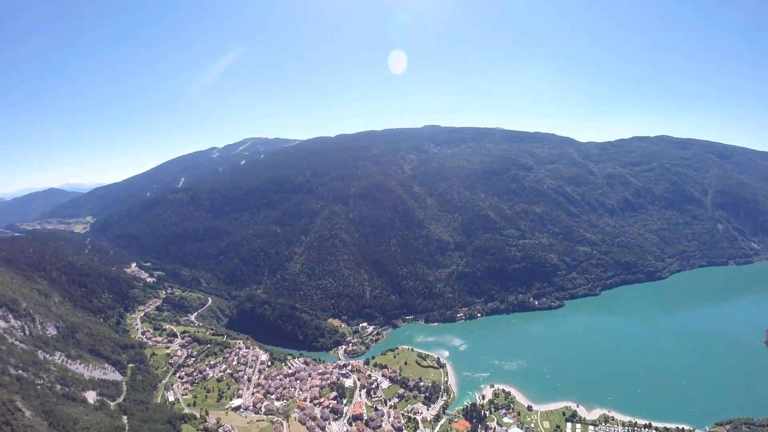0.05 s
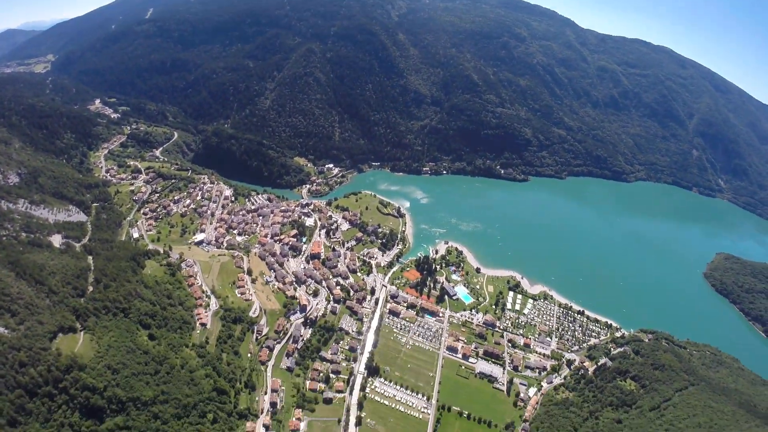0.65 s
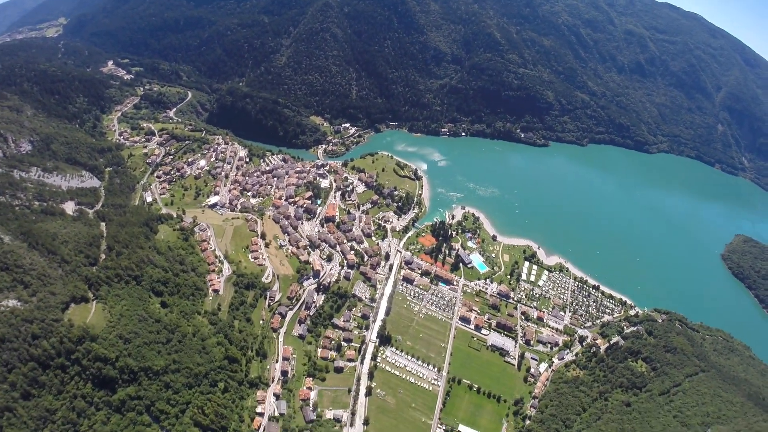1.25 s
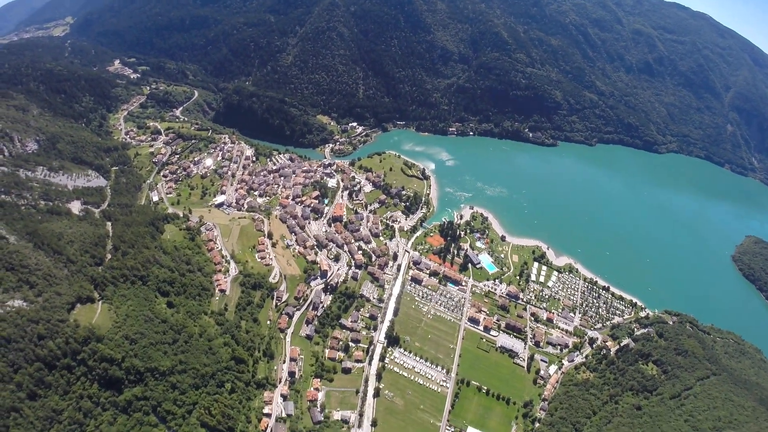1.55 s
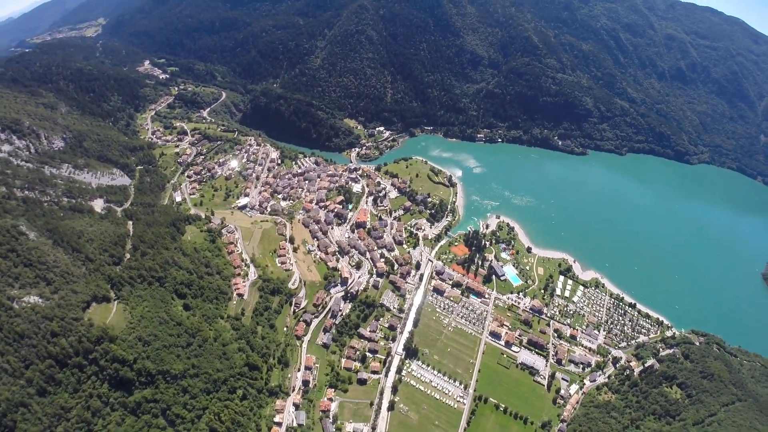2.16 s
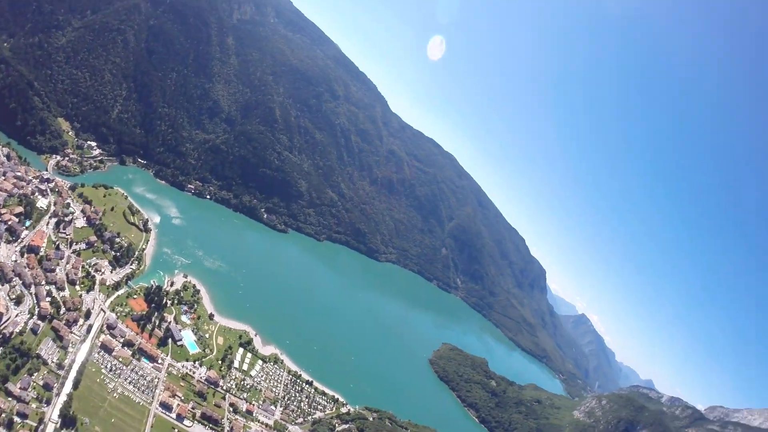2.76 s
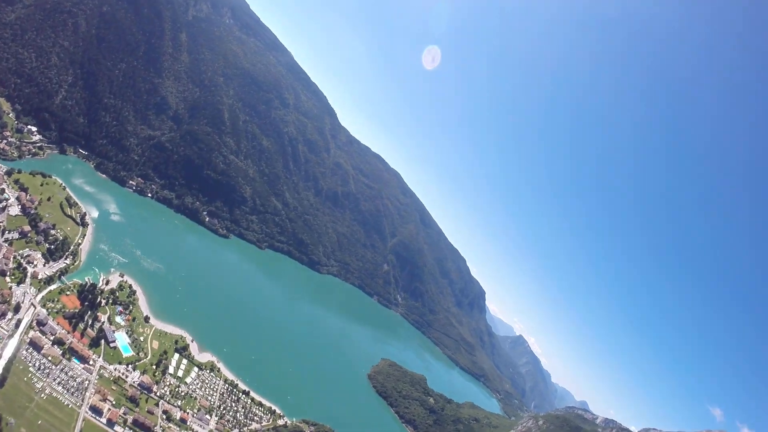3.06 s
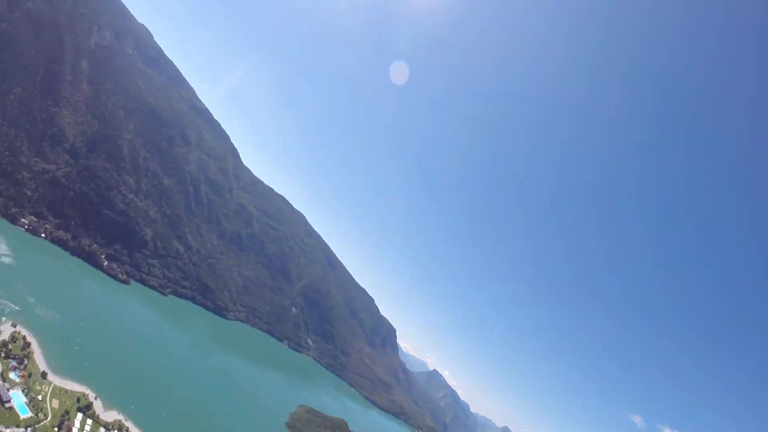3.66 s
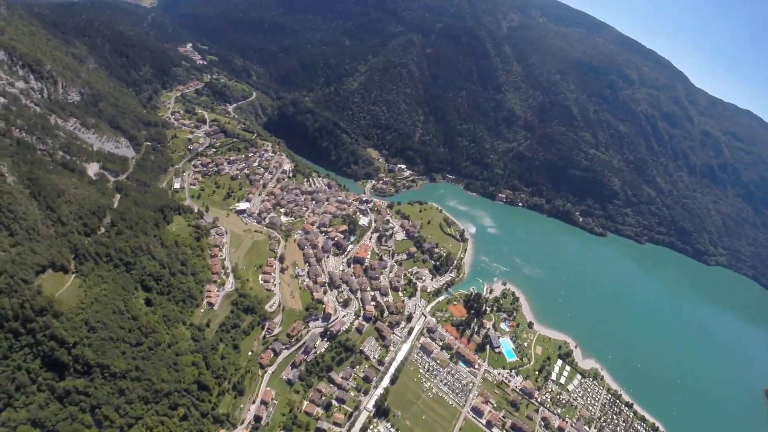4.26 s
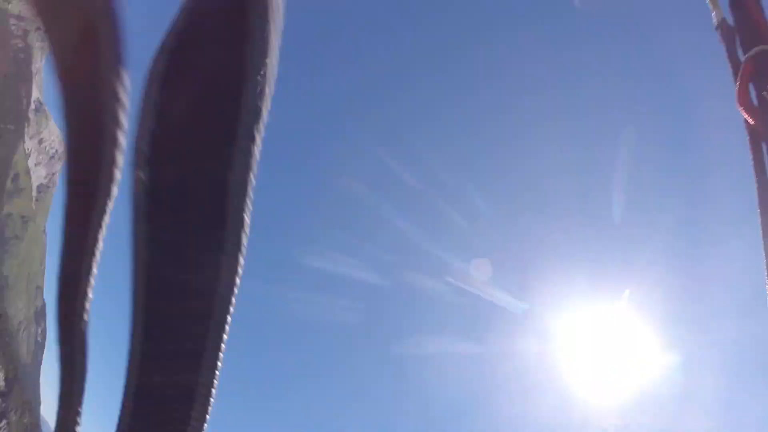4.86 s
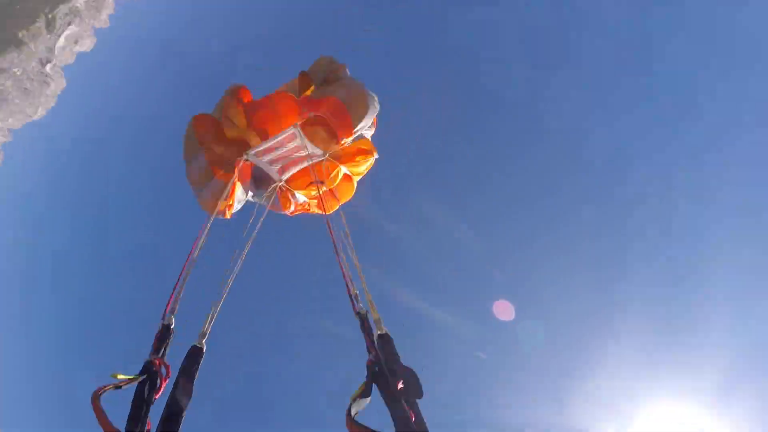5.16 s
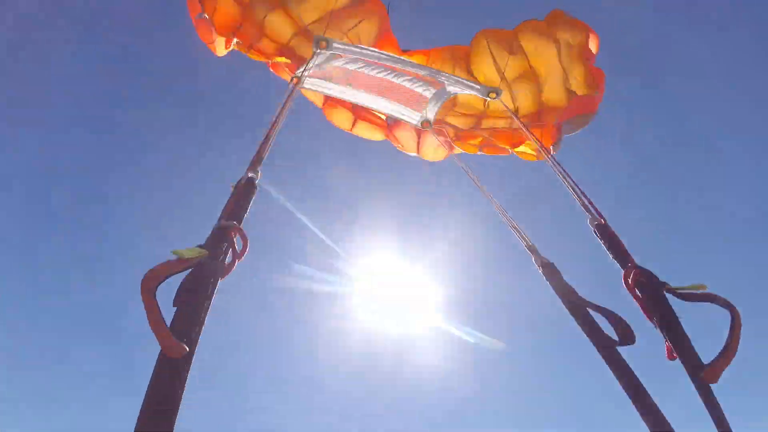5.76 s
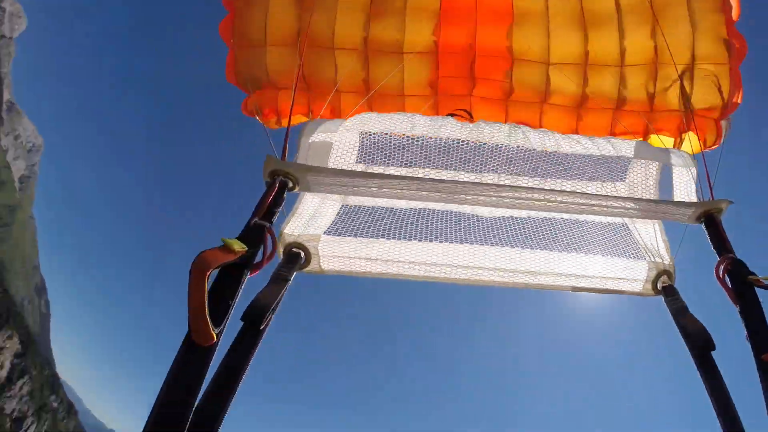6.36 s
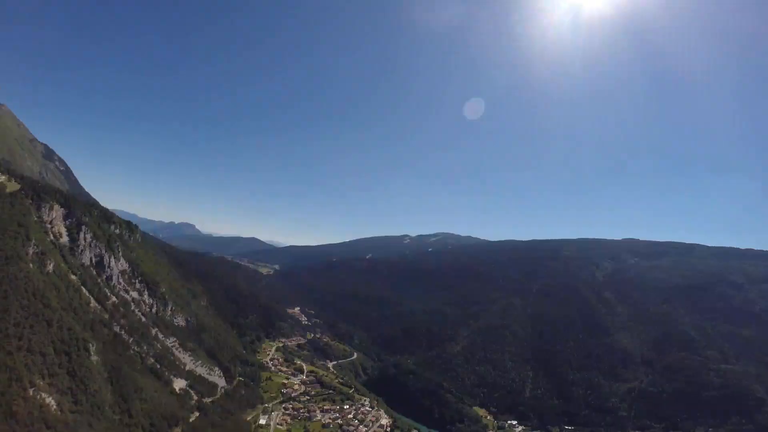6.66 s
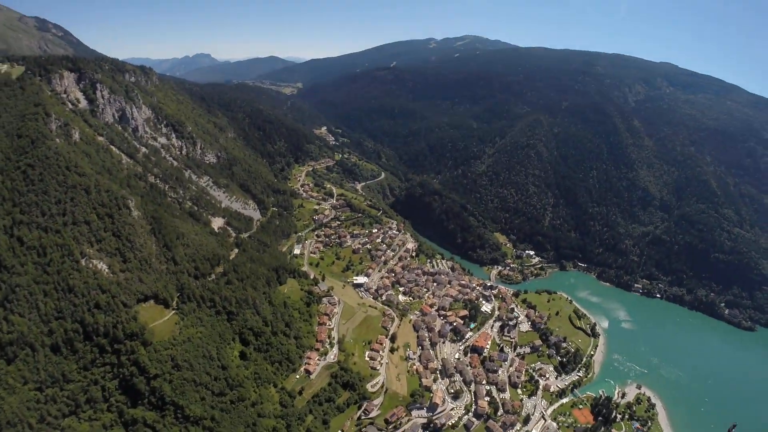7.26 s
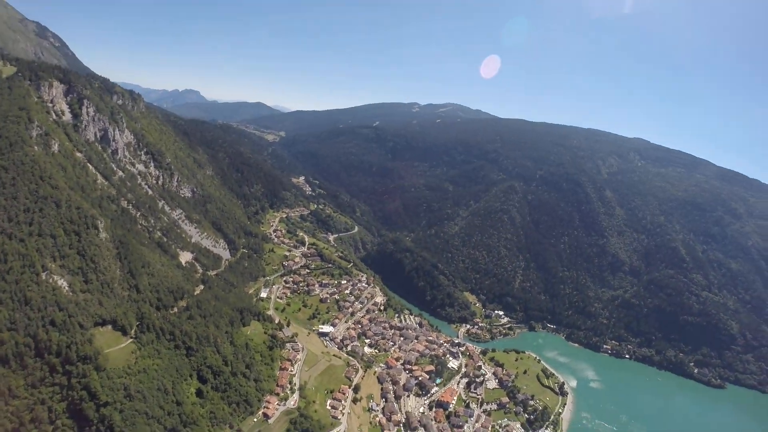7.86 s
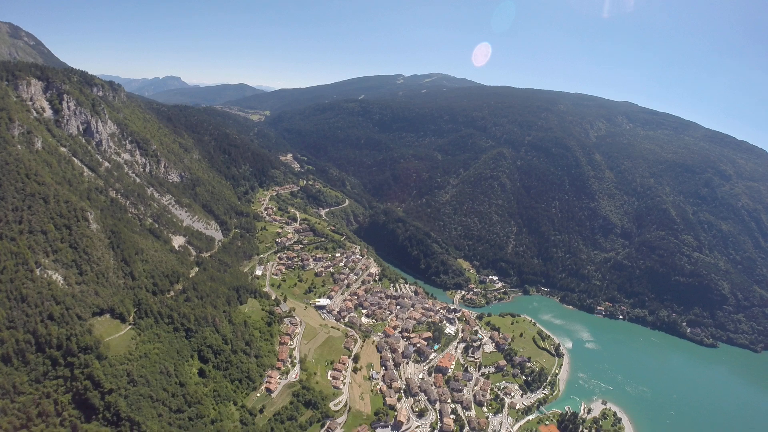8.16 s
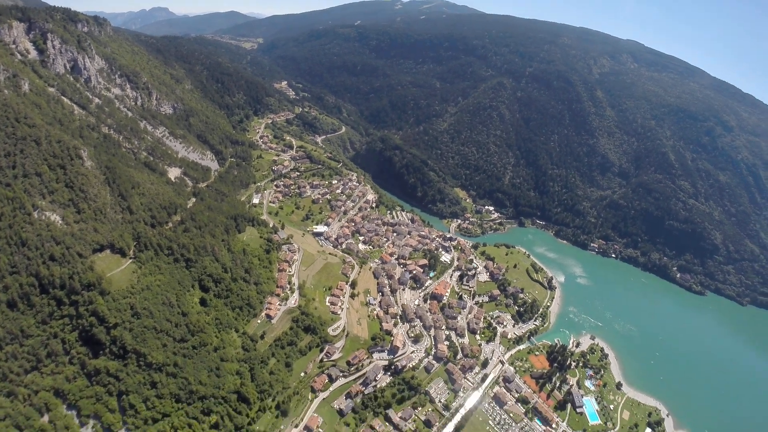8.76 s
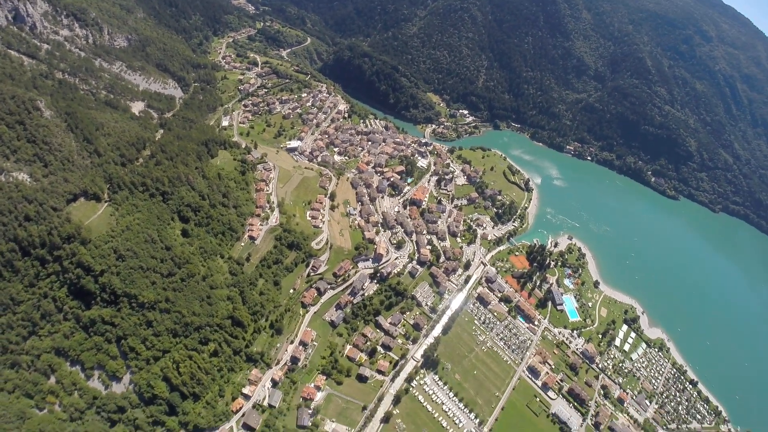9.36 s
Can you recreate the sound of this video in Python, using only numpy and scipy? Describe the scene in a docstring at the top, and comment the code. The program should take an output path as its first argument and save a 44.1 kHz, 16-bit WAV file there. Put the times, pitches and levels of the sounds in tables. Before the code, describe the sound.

From the start, loud wind roars steadily right at a helmet microphone, a hollow, hissing rush in open air with no echo. Low booming gusts buffet it, especially from about 2.7 to 4 seconds. At 4.5 seconds a parachute is thrown: the harness thumps, cloth flicks and shakes out, and the rush falls away by 4.8. Gear knocks against the helmet, then at about 5.2 seconds the straps snap taut with one very loud crack. The wind ducks sharply and returns much quieter. The canopy rustles, flutters and ticks overhead until about 8 seconds, over low gusts and a few soft tugs. Between 6.5 and 7 seconds a strap swoops past, and metal rings rasp down the lines with a light fabric swish. The taut lines hum faintly, a couple of small taps follow after 8 seconds, and the wind swells again around 9.3 seconds.

```python
"""Wind roars and buffets right at the microphone of a helmet camera, gliding fast through open air.
The air rings in the hollows of the housing, and gusts set the mount booming. About 4.5 s in, a
parachute is thrown: the harness thumps, the rush falls away, the risers snap taut at arm's length.
The wind's level ducks sharply after the snap, then recovers. Overhead the canopy flutters and ticks
and the slider rasps down the lines. At the end the wind picks up again."""
import sys
import numpy as np
from scipy import signal
from scipy.fft import rfft, irfft, next_fast_len
from scipy.io import wavfile
from scipy.ndimage import uniform_filter1d

SR = 44100
rng = np.random.default_rng(int(sys.argv[2]) if len(sys.argv) > 2 else 0)


def file_out(sig):
    """Save sig as 16-bit WAV at sys.argv[1]."""
    # one column per channel
    cols = np.atleast_2d(sig).T
    # limit, then scale
    lim = np.clip(cols, -1, 1)
    pcm = np.round(lim * 32767).astype(np.int16)
    wavfile.write(sys.argv[1], SR, pcm)


N = 419832
TIME = np.arange(N) / SR
FFT_SIZE = next_fast_len(N, real=True)
BIN_HZ = np.maximum(np.arange(FFT_SIZE // 2 + 1) * SR / FFT_SIZE, 1)
CRUISE_RUSH_DB, CRUISE_WASH_DB = -20, -36  # steady glide: the reference for the wind's levels

# Housing resonances around the microphone, low and high: pitch_hz, width_hz, head_on_db, glancing_db
HOLLOW_MODES = [(1077, 188, -10.5, -1.5), (1280, 170, -1.5, 1.5), (1531, 410, 1.5, -3.5),
                (1885, 750, -11.5, -2.5)]
RUSH_MODES = [(2403, 900, -1, -6.5), (2976, 650, 1.5, 0.5), (3430, 480, -1, 2.5), (4006, 430, -12.5, -8.5),
              (4290, 390, -9, -18)]
# Faint whistles off the housing's edges: pitch_hz, width_hz, gain_db
EDGE_MODES = [(3820, 780, 3), (4970, 350, -43), (6090, 520, -3), (6620, 720, -30), (10430, 390, -18.5),
              (11330, 380, -35), (13780, 700, -39)]
# Angle of the air on the housing: time_s, glancing_share (0-1)
AIR_ANGLE = [(0, 0.03), (2.9, 0.19), (3.3, 0.4), (3.45, 0.97), (3.9, 1), (4.0, 0.1), (4.3, 0.45),
             (4.8, 0.4), (5.4, 0.73), (8.9, 0.3), (9.35, 0.5), (9.52, 0.5)]
# Wind level as heard; it ducks sharply after the loud snap, then recovers:
# time_s, rush_db, hollow_re_rush_db
EARLY_RUSH_LEVELS = [(0.0, -12.5, -7), (0.03, -15.5, -4.5), (0.68, -17, -3), (0.97, -22, 0),
                     (1.64, -17.5, -2), (1.75, -18.5, 1.5), (2.24, -19, -3.5), (2.53, -15.5, -1.5),
                     (3.15, -19, 0.5), (3.33, -21, 1), (3.47, -18.5, -8), (3.92, -21.5, -3.5),
                     (3.95, -13.5, -2.5), (3.99, -16, -0.5), (4.02, -14, -7), (4.07, -18.5, -5),
                     (4.18, -18.5, -3.5), (4.22, -26, 0), (4.4, -22.5, 0), (4.48, -16, -3),
                     (4.49, -20, 4.5), (4.55, -16.5, -8.5), (4.75, -33.5, 5), (4.76, -42, 2)]
LATE_RUSH_LEVELS = [(4.8, -42, 5.5), (5.03, -39.5, -2), (5.22, -41, 4), (5.26, -63, 0), (5.6, -43, -8),
                    (8.2, -57, 2), (9.0, -54, 2.5), (9.27, -41, -0.5), (9.35, -25.5, -11), (9.52, -24, -4)]
# Level of the wind's low wash as heard; it too ducks after the snap, then recovers: time_s, wash_db
EARLY_WASH_LEVELS = [(0.04, -33), (0.4, -32.5), (0.97, -38.5), (1.74, -34.5), (2.32, -37.5), (2.51, -33.5),
                     (3.95, -31.5), (4.02, -37), (4.7, -38)]
LATE_WASH_LEVELS = [(4.95, -46), (5.04, -52), (5.22, -31), (5.27, -73), (5.56, -49.5), (6.05, -54.5),
                    (6.85, -50), (8.1, -57.5), (8.55, -52), (8.9, -53.5), (9.52, -53)]
# Wind spectra at the microphone, lowest to highest: frequency_hz, density_db
DEEP_SPECTRUM = [(8, -3.5), (22, -5), (42, 0), (60, -10.5), (100, -45)]
BOOM_SPECTRUM = [(25, -19.5), (45, -10.5), (60, -8.5), (72, 5.5), (84, 4), (98, -8.5), (130, -15.5),
                 (200, -42), (500, -77)]
BUFFET_SPECTRUM = [(70, -3.5), (115, 3), (150, 1.5), (210, 0), (320, -3), (410, -10.5), (560, -21.5),
                   (1000, -44.5)]
WASH_SPECTRUM = [(200, -9), (380, 1), (520, 1), (760, -1.5), (950, -3), (1300, -2.5), (2500, -39.5)]
HISS_SPECTRUM = [(3000, -30), (4400, 4), (5200, 2.5), (6300, -5.5), (7200, -8), (9500, -13.5),
                 (10600, -16.5), (12500, -28), (14300, -30), (15500, -47)]
# Large eddies striking the camera: start_s, length_s, boom_db, deep_db, buffet_db
GUST_SPELLS = [(0, 0.56, -35, -33, -31.5), (1.65, 0.86, -39, -43, -59), (2.667, 0.19, -26, -31, -32),
               (2.847, 0.34, -30, -35, -35), (3.374, 0.4, -27, -30, -24), (3.709, 0.21, -20, -41, -22.5),
               (4.434, 0.13, -23, -22.5, -32.5), (4.695, 0.18, -23, -30, -35), (4.78, 0.2, -21.5, -43, -30),
               (5.015, 0.16, -24.5, -28, -34.5), (5.344, 0.88, -35.5, -31.5, -52.5),
               (5.523, 0.075, -33, -31, -38.5), (5.71, 0.12, -30, -28, -42),
               (6.306, 0.088, -34.5, -28.5, -43), (6.44, 0.19, -25.5, -25.5, -45),
               (6.65, 0.32, -28.5, -28, -47), (6.957, 0.43, -44, -35.5, -60), (7.468, 0.11, -51, -36, -45),
               (7.618, 0.32, -38.5, -38, -60), (9.24, 0.25, -41, -50, -44.5)]

# Taut lines humming in slower air: start_s, length_s, level_db
HUM_SPELLS = [(6.9, .2, -50), (7.42, .2, -60), (8.45, 1, -60.5), (9.25, .27, -56)]
# Tones of that hum: pitch_hz, width_hz, gain_db
HUM_MODES = [(487, 78, -2), (540, 46, 0)]
# A riser swinging past the microphone: nearest_s, level_db, pitch_hz, glide_octaves_per_s, half_length_s
RISER_PASSES = [(6.528, -29, 194, 1, 0.012), (6.873, -22.5, 130.5, -11, 0.034)]
# Slider fabric swishing down and settling: start_s, length_s, level_db
SWISH_SPELLS = [(6.87, 0.073, -57.5), (6.98, .22, -70), (8.48, .12, -70)]
# Bands of that swish: pitch_hz, width_hz, gain_db
SWISH_MODES = [(7860, 1300, 0), (9300, 990, 0)]
# Slider grommets catching on the lines: start_s, length_s, level_db, pitch_hz
GROMMET_CATCHES = [(6.593, 0.052, -43, 1250), (6.735, .06, -36, 1380), (6.798, 0.073, -37.5, 1510),
                   (6.88, 0.045, -44, 1750)]
# Cloth shaking out, filling and flapping overhead: start_s, length_s, level_db, crackle_re_rustle_db
RUSTLE_SPELLS = [(4.834, 0.056, -25, -11.5), (4.894, 0.076, -31.5, -18), (5.034, 0.11, -40, -14),
                 (5.12, 0.089, -33.5, -16), (5.366, 0.18, -46.5, -12), (5.479, .31, -41.5, -10),
                 (5.548, 0.052, -38, -13), (5.788, .3, -51.5, -19), (6.068, 0.95, -43.5, -5),
                 (7.003, .22, -48, -16), (7.334, 0.71, -51.5, -1.5), (7.476, 0.12, -47.5, -8),
                 (7.75, 0.065, -50, -7), (8.5, .11, -57, -4)]
# Cloth and lines flicking: start_s, relative_level_db, dull_offset_db
CLOTH_FLICKS = [(4.477, -11, -1), (4.752, -12.5, -7.5), (4.777, -19, -15), (4.8535, -12, -12),
                (4.874, -8.5, -7), (5.216, -11, -20), (5.9715, -18.5, -26), (6.3041, -27, -21),
                (6.4971, -25, -9), (6.641, -29, 8), (6.686, -29, 2), (6.7356, -31, 3), (7.3786, -28, -14),
                (7.413, -26, -10), (7.444, -23.5, -22), (7.503, -23.5, -22), (7.6635, -36, -8),
                (7.7973, -28, -23), (7.883, -29, -16)]
# Spectrum of a sharp flick: frequency_hz, density_db
FLICK_SPECTRUM = [(800, -30.5), (1800, -5.5), (2600, -3.5), (3400, 3.5), (4500, -11.5), (7000, -29),
                  (14000, -48)]
# Gear tapping the helmet, close by the microphone: start_s, level_db, pitch_hz, t60_s
HELMET_KNOCKS = [(4.912, -12.5, 570, 0.023), (4.982, -17, 620, 0.03), (5.141, -3.5, 440, 0.021),
                 (6.498, -29, 1320, .025), (6.64, -28, 1200, .02), (8.259, -31, 1300, 0.029),
                 (8.725, -39, 1300, .04)]
# Tugs through the harness: start_s, push_db, length_s
HARNESS_TUGS = [(4.513, -4.5, 0.018), (4.848, -8.5, 0.0047), (4.976, -14, 0.0032), (5.1283, -5, 0.0085),
                (5.1402, 1, 0.0044), (5.215, -5, 0.009), (5.227, -3.5, 0.0017), (5.486, -15, 0.0092),
                (5.574, -19, 0.0062), (5.746, -17.5, 0.0054), (6.519, -26, 0.0035), (6.554, -13, 0.0064),
                (8.105, -20, 0.011), (8.258, -24.5, 0.0099)]
# Ringing of the camera mount and of the metal on the risers: pitch_hz, gain_db, t60_s
MOUNT_MODES = [(79.2, 0, 0.12), (146, -2.5, 0.03), (263, 6.5, 0.015)]
HARDWARE_MODES = [(2280, -20, 0.05), (1870, -37, 0.077)]

# Notches of the microphone port: centre_hz, width_hz, depth (0-1)
PORT_NOTCHES = [(2340, 90, 0.18), (4910, 260, 0.4), (5460, 230, 0.45), (11100, 350, 0.4), (12800, 600, .25)]
# The microphone's self-noise: frequency_hz, density_db
SELF_NOISE_SPECTRUM = [(2000, 12), (6000, -2), (9000, -5), (12000, -8.5), (15500, -12)]


def from_db(db):
    """Decibels to gain."""
    return 10 ** (np.asarray(db) / 20)


def unit_power(x):
    """Scale to a mean square of 1."""
    return x / np.sqrt(np.mean(x ** 2) + 1e-20)


def curves(*tables):
    """Join tables of (time_s, value, ..) and give one curve per value column."""
    times, *columns = np.vstack(tables).T
    return [np.interp(TIME, times, column) for column in columns]


def filtered(x, gain):
    """Apply a gain at each frequency."""
    return irfft(rfft(x, FFT_SIZE) * gain, FFT_SIZE)[:N]


def smooth_noise(spectrum):
    """Unit-power noise that follows (frequency_hz, density_db) points."""
    hz, db = np.transpose(spectrum)
    gain = from_db(np.interp(np.log(BIN_HZ), np.log(hz), db, left=-100, right=-100))
    return unit_power(filtered(rng.standard_normal(N), gain))


def resonant_noise(modes):
    """Unit-power turbulence ringing in steep-sided resonances."""
    power = sum((from_db(db) / (1 + (2 * (BIN_HZ - hz) / width) ** 2)) ** 2 for hz, width, db in modes)
    return unit_power(filtered(rng.standard_normal(N), np.sqrt(power)))


def drift(rate_hz):
    """Random wandering up to the given rate, spread 1."""
    pole, run_in = np.exp(-2 * np.pi * rate_hz / SR), SR // 4
    wander = signal.lfilter([1], [1, -2 * pole, pole ** 2], rng.standard_normal(N + run_in))
    return unit_power(wander[run_in:])


def flutter(depth_db, rate_hz):
    """A randomly fluctuating gain whose mean power stays 1."""
    nepers = depth_db * np.log(10) / 20
    return np.exp(nepers * drift(rate_hz) - nepers ** 2)


def ring(push, hz, t60):
    """A resonator: a unit click sets a sine of height 1 ringing."""
    radius, angle = from_db(-60 / (t60 * SR)), 2 * np.pi * hz / SR
    return signal.lfilter([0, np.sin(angle)], [1, -2 * radius * np.cos(angle), radius ** 2], push + 1e-18)


def bursts(times, levels_db, t60):
    """An envelope that jumps up in half a millisecond at each time and dies away."""
    envelope, age = np.zeros(N), np.arange(SR // 10) / SR
    shape = from_db(-60 * age / t60) * np.minimum(age / 0.0005, 1)
    for start, db in zip(times, levels_db):
        at = int(start * SR)
        envelope[at:at + len(age)] += from_db(db) * shape
    return envelope


def spells(rows, attack_s, t60):
    """Envelope of (start_s, length_s, level_db) rows: each rises, holds and dies away; powers add."""
    t, power = TIME[::8], 0
    for start, length, db in rows:
        rise = np.clip((t - start) / attack_s, 0, 1)
        decay_db = 60 * np.clip((t - start - length) / t60, 0, 2)
        power += (rise * from_db(db - decay_db)) ** 2
    return np.interp(TIME, t, np.sqrt(power))


def rumble(spectrum):
    """Low noise of eddies that follow one another without long gaps."""
    lumps = smooth_noise(spectrum)
    return lumps / np.sqrt(uniform_filter1d(lumps ** 2, size=SR // 5))


def eddies(wash_offset_db):
    """Lumps of pressure right on the microphone port swell in gusts; the mount booms along."""
    starts, lengths, *levels = np.transpose(GUST_SPELLS)
    boom_gust, deep_gust, buffet_gust = [
        spells(zip(starts, lengths, db), attack_s=0.038, t60=0.23) for db in levels]
    wash = from_db(-11) * buffet_gust * smooth_noise(WASH_SPECTRUM)
    # Gusts add in power to a bed that follows the level of the low wash.
    boom = np.hypot(boom_gust, from_db(-36 + 0.27 * wash_offset_db)) * rumble(BOOM_SPECTRUM)
    deep = np.hypot(deep_gust, from_db(-40.5 + 0.27 * wash_offset_db)) * rumble(DEEP_SPECTRUM)
    buffet = np.hypot(buffet_gust, from_db(-38 + 0.79 * wash_offset_db)) * smooth_noise(BUFFET_SPECTRUM)
    return wash + boom + deep + buffet * flutter(depth_db=1.7, rate_hz=47)


def housing_noise(modes, glancing):
    """The angle of the air decides which of the housing's resonances speak."""
    head_on = resonant_noise([(hz, width, db) for hz, width, db, _ in modes])
    sideways = resonant_noise([(hz, width, db) for hz, width, _, db in modes])
    return np.sqrt(1 - glancing) * head_on + np.sqrt(glancing) * sideways


def air_hiss(hiss_db, edge_db, shelf_db, shelf_hz):
    """Fine turbulence with faint edge tones; a shelf lifts or lowers the very top."""
    air = from_db(hiss_db) * smooth_noise(HISS_SPECTRUM) + from_db(edge_db) * resonant_noise(EDGE_MODES)
    below_shelf = filtered(air, 1 / (1 + (BIN_HZ / shelf_hz) ** 10))
    return below_shelf + from_db(shelf_db) * (air - below_shelf)


def wind_roar(wash_offset_db):
    """Air roars across the housing; hiss grows with the rush and the wash, edge tones with a side wind."""
    rush_db, hollow_db = curves(EARLY_RUSH_LEVELS, LATE_RUSH_LEVELS)
    glancing = curves(AIR_ANGLE)[0]
    wash = from_db(CRUISE_WASH_DB + wash_offset_db) * smooth_noise(WASH_SPECTRUM)
    hollow = from_db(rush_db + hollow_db + 0.24) * housing_noise(HOLLOW_MODES, glancing)
    hollow *= flutter(depth_db=0.34, rate_hz=53)
    rush = from_db(rush_db) * housing_noise(RUSH_MODES, glancing)
    hiss_db = -34.5 + 0.61 * (rush_db - CRUISE_RUSH_DB) + 0.66 * wash_offset_db
    edge_db = rush_db - 16.5 + 9 * glancing ** 2 + 0.24 * wash_offset_db
    shelf_db = 1 + 0.39 * wash_offset_db + 5.5 * np.sqrt(glancing)
    hiss = air_hiss(hiss_db, edge_db, shelf_db, shelf_hz=9700)
    flutter_db = 0.6 + 0.035 * np.maximum(-wash_offset_db, 0)  # deeper as the wash gets quieter
    return (wash + hollow + rush + hiss) * flutter(flutter_db, rate_hz=44)


def line_hum():
    """Vortices peel off the suspension lines overhead at a pitch set by their thickness."""
    return spells(HUM_SPELLS, attack_s=0.091, t60=1.1) * resonant_noise(HUM_MODES)


def riser_swoops(waver, octave_db):
    """A strap hums at its vortex-shedding rate, gliding in pitch as it passes the microphone."""
    swoops = np.zeros(N)
    for nearest, db, hz, glide, half_length in RISER_PASSES:
        age = np.clip(TIME - nearest, -0.2, 0.2)
        pitch_hz = hz * 2 ** (glide * age) * (1 + waver * drift(rate_hz=56))
        phase = 2 * np.pi * np.cumsum(pitch_hz) / SR
        tone = np.sin(phase) + from_db(octave_db) * np.sin(2 * phase)
        swoops += from_db(db) * np.exp(-(age / half_length) ** 2) * tone
    return swoops


def slider(chatter_db, width_hz):
    """Fabric swishes down the lines while its grommets catch and rasp, higher as they gather speed."""
    swish = spells(SWISH_SPELLS, attack_s=0.04, t60=0.3) * resonant_noise(SWISH_MODES)
    rasp = np.zeros(N)
    for start, length, db, hz in GROMMET_CATCHES:
        catch = spells([(start, length, db)], attack_s=0.015, t60=0.12)
        rasp += catch * resonant_noise([(hz, width_hz, 0)])
    return swish + rasp * flutter(chatter_db, rate_hz=90)


def crease_crackle(pops_per_s, spread_db, band_hz):
    """Tiny catches of cloth pop at random and ring briefly in the housing; unit power."""
    sizes = from_db(spread_db * np.minimum(rng.exponential(1, N), 3))
    pops = sizes * (rng.random(N) < pops_per_s / SR)
    rings = sum(from_db(db) * ring(pops * rng.standard_normal(N), hz, t60=2.8 / width)
                for hz, width, _, db in RUSH_MODES)
    bandpass = signal.butter(2, band_hz, "band", fs=SR, output="sos")
    return unit_power(signal.sosfilt(bandpass, rings))


def canopy_cloth(wash_offset_db, glancing):
    """Cloth rustles and crackles overhead, heard through the housing; flapping chops all of it."""
    starts, lengths, level_db, crackle_db = np.transpose(RUSTLE_SPELLS)
    rustle_gain, crackle_gain = [spells(zip(starts, lengths, db), attack_s=0.035, t60=0.095)
                                 for db in (level_db, level_db + crackle_db)]
    rustle = housing_noise(RUSH_MODES, glancing) + from_db(-4) * housing_noise(HOLLOW_MODES, glancing)
    hiss = air_hiss(hiss_db=-14, edge_db=-18, shelf_db=1 + 0.39 * wash_offset_db, shelf_hz=9000)
    crackle = crease_crackle(pops_per_s=110, spread_db=4.5, band_hz=(900, 4930))
    return (rustle_gain * (rustle + hiss) + crackle_gain * crackle) * flutter(depth_db=3, rate_hz=98)


def cloth_flicks(t60, sharp_trim_db, dull_trim_db):
    """Short cracks of cloth and line, some sharp, some hollow."""
    times, level_db, dull_offset_db = np.transpose(CLOTH_FLICKS)
    sharp = bursts(times, level_db + sharp_trim_db, t60) * smooth_noise(FLICK_SPECTRUM)
    hollow = resonant_noise([(hz, width, db) for hz, width, _, db in HOLLOW_MODES])
    dull = bursts(times, level_db + dull_offset_db + dull_trim_db, 0.77 * t60) * hollow
    return sharp + dull


def helmet_knocks():
    """A loose toggle or strap end taps the helmet beside the microphone: one short dull ring each."""
    knocks, age = np.zeros(N), np.arange(SR // 10) / SR
    for start, db, hz, t60 in HELMET_KNOCKS:
        at = int(start * SR)
        envelope = from_db(db - 60 * age / t60) * np.minimum(age * hz / 2, 1)  # two cycles to rise
        knocks[at:at + len(age)] += envelope * np.sin(2 * np.pi * hz * age)
    return knocks


def harness_jolts():
    """Each tug on the harness is a soft push that sets the camera mount booming."""
    push = np.zeros(N)
    for start, db, length in HARNESS_TUGS:
        shape, at = np.hanning(int(length * SR)), int(start * SR)
        push[at:at + len(shape)] += from_db(db) * shape / shape.sum()
    return sum(from_db(db) * ring(push, hz, t60) for hz, db, t60 in MOUNT_MODES)


def riser_snap(start_s, length_s, jerk_db, start_hz, rise_hz_per_s, rasp):
    """The risers slam taut: webbing squeals through its ring, rising as it speeds up; the metal rings."""
    jerk = spells([(start_s, length_s, jerk_db)], attack_s=0.0009, t60=0.0071)
    pitch_hz = start_hz + rise_hz_per_s * np.clip(TIME - start_s, 0, length_s)
    pitch_hz *= 1 + rasp * drift(rate_hz=2000)
    squeal = np.sin(2 * np.pi * np.cumsum(pitch_hz) / SR)
    crack = from_db(-16) * smooth_noise(FLICK_SPECTRUM)
    thud = from_db(-6.5) * smooth_noise(WASH_SPECTRUM)
    strike = np.zeros(N)
    strike[np.argmax(jerk)] = 1
    metal = sum(from_db(db) * ring(strike, hz, t60) for hz, db, t60 in HARDWARE_MODES)
    return jerk * (squeal + crack + thud) + metal


def scene():
    """Everything reaches the one helmet microphone directly: open air has no echo."""
    wash_offset_db = curves(EARLY_WASH_LEVELS, LATE_WASH_LEVELS)[0] - CRUISE_WASH_DB
    canopy = canopy_cloth(wash_offset_db, glancing=0.53)
    canopy += cloth_flicks(t60=0.029, sharp_trim_db=-7, dull_trim_db=-5)
    rigging = slider(chatter_db=3.5, width_hz=480) + line_hum() + riser_swoops(waver=0.08, octave_db=-12)
    thumps = harness_jolts() + helmet_knocks()
    snap = riser_snap(start_s=5.2293, length_s=0.0027, jerk_db=3.5,
                      start_hz=2001, rise_hz_per_s=265000, rasp=0.0802)
    wind = wind_roar(wash_offset_db) + eddies(wash_offset_db)
    return (wind + rigging + canopy + thumps + snap)[None, :]


def record(dry):
    """The port carves narrow dips, the microphone hisses faintly, the snap overloads it, the top is cut."""
    ceiling, cutoff_hz = 0.96, 15400
    notches = [1 - depth / (1 + (2 * (BIN_HZ - hz) / width) ** 2) for hz, width, depth in PORT_NOTCHES]
    self_noise = from_db(-66.5) * smooth_noise(SELF_NOISE_SPECTRUM)
    heard = filtered(dry[0], np.prod(notches, axis=0)) + self_noise
    clipped = heard / (1 + (heard / ceiling) ** 6) ** (1 / 6)
    lowpass = signal.ellip(10, 0.1, 90, cutoff_hz, fs=SR, output="sos")
    return signal.sosfilt(lowpass, clipped)[None, :]


dry = scene()
out = record(dry)
file_out(out)
```